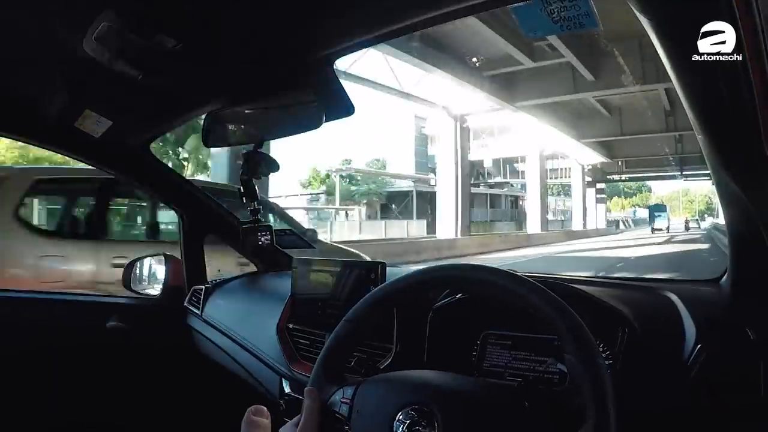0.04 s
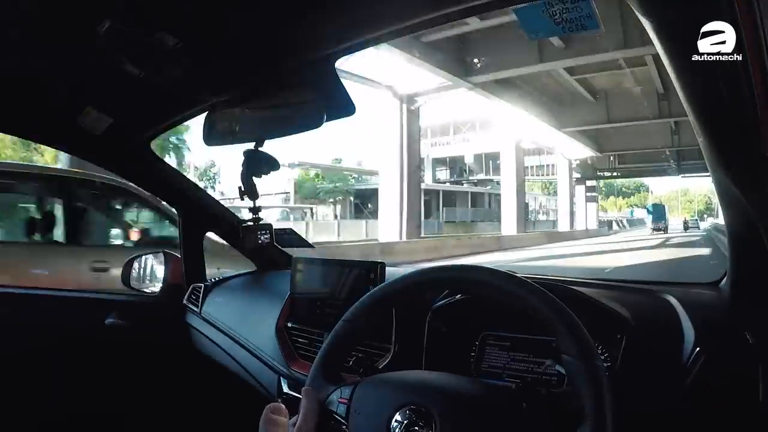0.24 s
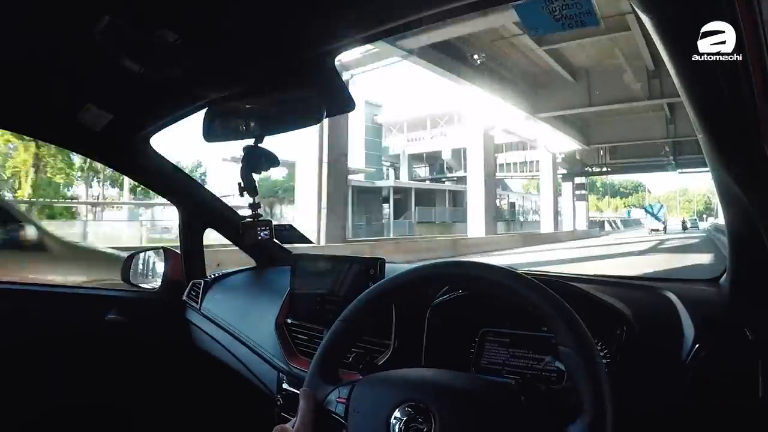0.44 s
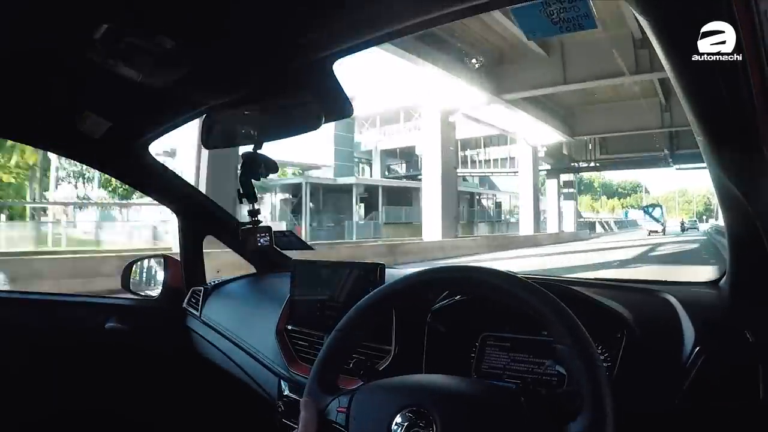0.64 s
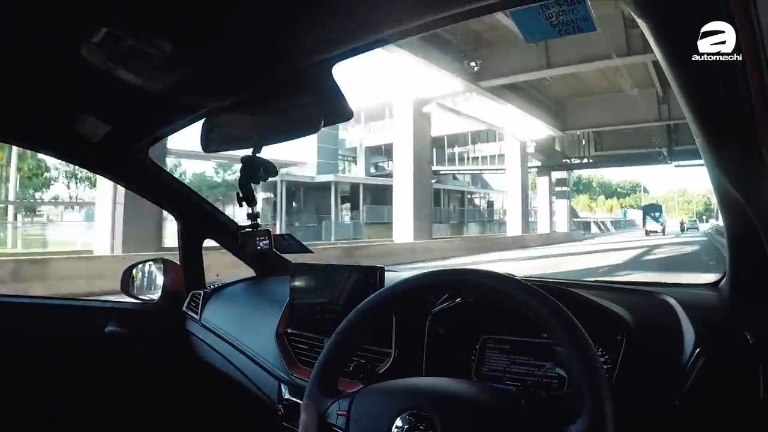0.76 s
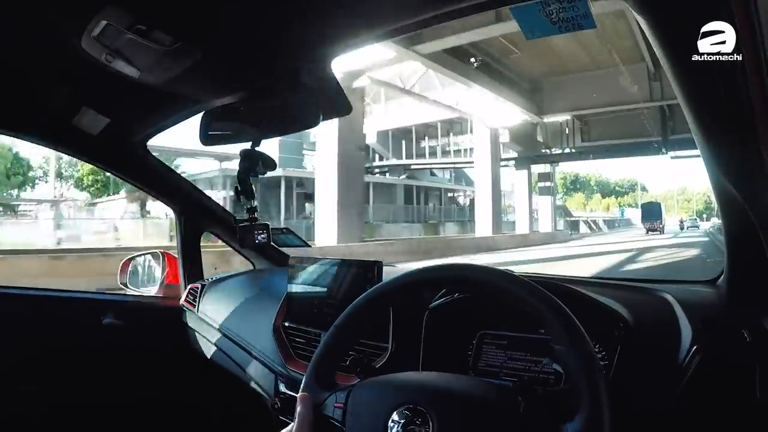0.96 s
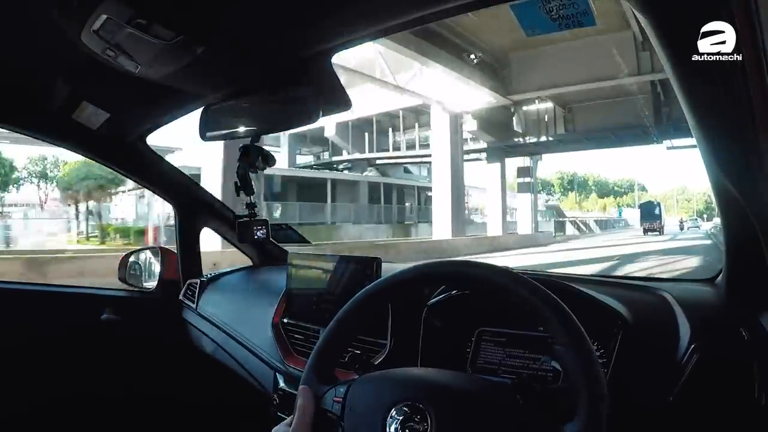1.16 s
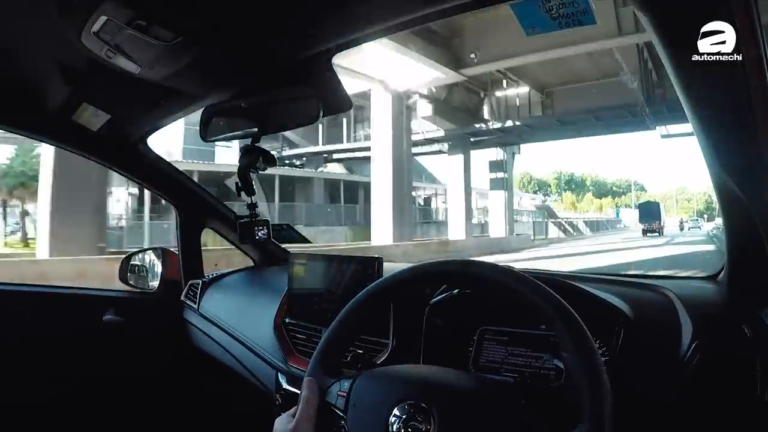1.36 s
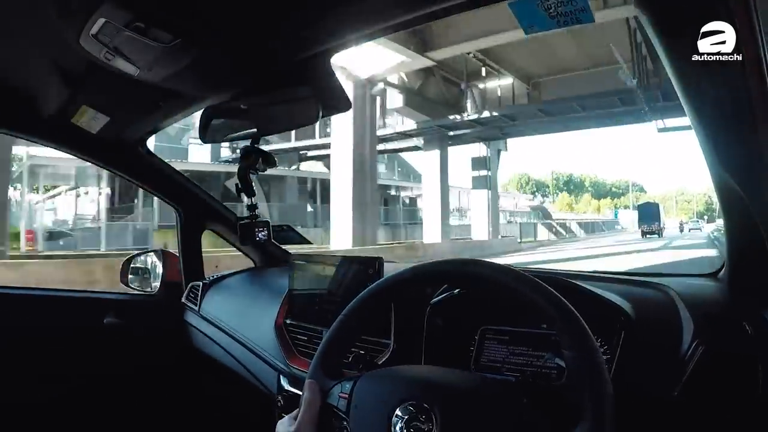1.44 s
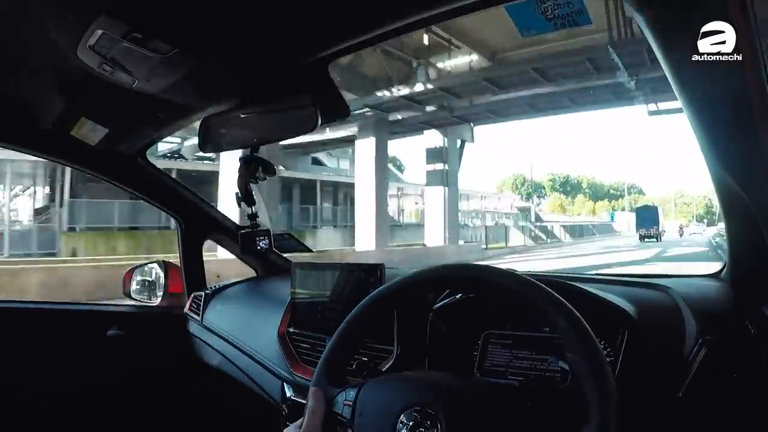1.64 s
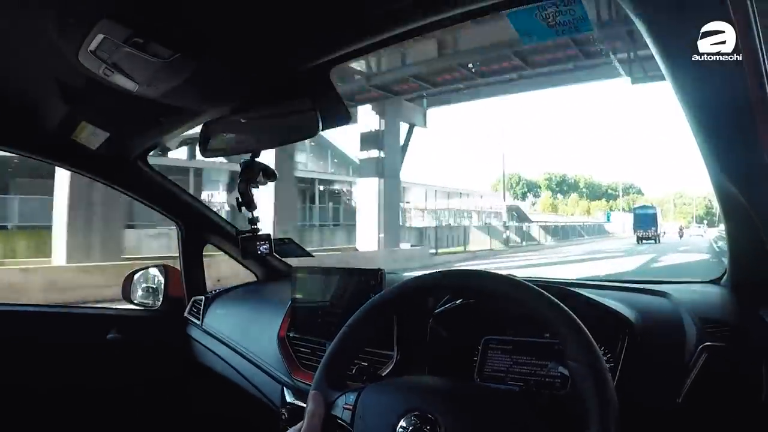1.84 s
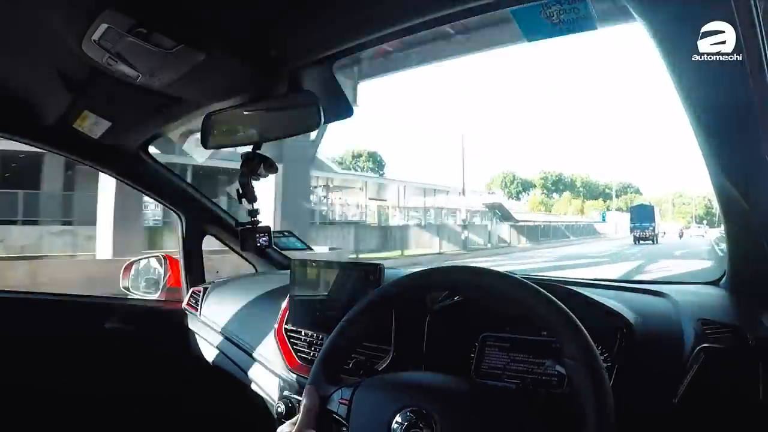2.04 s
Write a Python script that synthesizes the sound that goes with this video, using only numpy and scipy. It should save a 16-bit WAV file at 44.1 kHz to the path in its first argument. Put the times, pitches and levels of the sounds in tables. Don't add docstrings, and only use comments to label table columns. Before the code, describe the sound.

A four-cylinder car engine accelerates hard, heard by a microphone inside the closed cabin. From 0 seconds its low, boomy drone climbs through cabin resonances, rising more slowly after about 1.3. Tyres rumble underneath, with a soft thump near 0.3 and a stronger one near 1.35. Airy intake roar grows louder and brighter from about 1.1 until the cut at 2.1 seconds, over faint hiss.

```python
import sys
import numpy as np
from scipy import signal
from scipy.fft import rfft, irfft, next_fast_len
from scipy.io import wavfile
from scipy.ndimage import uniform_filter1d

SR = 44100
rng = np.random.default_rng(int(sys.argv[2]) if len(sys.argv) > 2 else 0)


def ratio_of_db(decibels):
    return 10 ** (np.asarray(decibels, float) / 20)


def unload_wav(signal):
    wavfile.write(
        sys.argv[1],
        SR,
        np.round(np.clip(np.atleast_2d(signal).T, -1, 1) * 32767).astype(np.int16),
    )


N = 92257


def evened(x):
    return x / np.sqrt(np.mean(x ** 2) + 1e-20)


def along(points):
    return np.interp(np.arange(N) / SR, *np.transpose(points))


def read(points, hz):
    f, value = np.transpose(points)
    return np.interp(np.log(hz + 1), np.log(f + 1), value)


def slow_chance(rate_hz):
    length = next_fast_len(N)
    spectrum = rfft(rng.standard_normal(length))
    smoothing = 1 + (np.fft.rfftfreq(length, 1 / SR) / rate_hz) ** 4
    return evened(irfft(spectrum / smoothing, length)[:N])


def patchy_noise(gain, patchy_db, size):
    frames = 4 * N // size + 12
    hz = np.fft.rfftfreq(size, 1 / SR)
    real, imaginary, patches = rng.standard_normal((frames, len(hz), 3)).T
    patches = uniform_filter1d(patches, size=10, axis=0)
    patches = evened(uniform_filter1d(patches, size=6, axis=1))
    spectra = (real + 1j * imaginary) * gain(hz)[:, None] * ratio_of_db(patchy_db * patches)
    sound = signal.istft(spectra, nperseg=size, noverlap=3 * size // 4)[1]
    return evened(sound[size:size + N])


# (t/s, firing rate f/Hz)
FIRING_RATE = [(0, 102.5), (.13, 109.4), (.4, 120.2), (.65, 134.8), (.91, 150.5), (1.04, 158.3),
               (1.17, 165.6), (1.3, 169.6), (1.43, 177.4), (1.56, 179.9), (1.69, 182), (1.82, 187),
               (2.09, 190.9)]


def firing_rate():
    return along(FIRING_RATE) * (1 + .0008 * slow_chance(rate_hz=3.3))


# (t/s, level/dB)
EFFORT = [
    (0, -5),
    (.3, -3.5),
    (.6, -3),
    (.85, -4),
    (1.1, -1),
    (1.4, 1),
    (1.7, 1),
    (2.09, 2),
]


def engine_effort():
    return along(EFFORT)


# (f/Hz, width/Hz, level/dB)
RESONANCES = [(228, 25, 5), (272, 18, 5), (310, 32, 9), (370, 25, 4), (468, 24, 6), (583, 18, 15),
              (685, 35, 6), (745, 35, 7), (890, 40, 5), (1110, 50, 7)]
# (f/Hz, width/Hz, depth 0-1)
DIPS = [(256, 10, .7), (293, 8, .5), (343, 14, .5), (418, 30, .6), (635, 30, .5)]


def cabin(hz):
    power = ratio_of_db(-5) ** 2
    for f, width, db in RESONANCES:
        power = power + ratio_of_db(db) ** 2 / (1 + (2 * (hz - f) / width) ** 2)
    gain = np.sqrt(power)
    for f, width, depth in DIPS:
        gain = gain * (1 - depth / (1 + (2 * (hz - f) / width) ** 2))
    return gain


# (f/Hz, level/dB)
BOOM = [(103, -26), (110, -23), (138, -24), (145, -35), (157, -45), (162, -30), (174, -25), (189, -18)]


def firing_tone(hz, turns):
    null_hz, null_width_hz, null_depth = 117.3, 3.5, .95
    null = 1 - null_depth / (1 + (2 * (hz - null_hz) / null_width_hz) ** 2)
    level_db = read(BOOM, hz) + 1.1 * slow_chance(rate_hz=11)
    return ratio_of_db(level_db) * null * np.sin(2 * np.pi * turns)


# (f/Hz, level/dB)
DRONE = [(206, -43), (220, -30), (236, -43), (257, -50), (268, -32), (285, -37), (318, -30), (340, -44)]


def second_order_drone(hz, turns):
    top_hz, top_width_hz, top_db = 368, 12, -36
    top = ratio_of_db(top_db) / (1 + (2 * (2 * hz - top_hz) / top_width_hz) ** 2)
    level = (ratio_of_db(read(DRONE, 2 * hz)) + top) * ratio_of_db(0.81 * slow_chance(rate_hz=30))
    return level * np.cos(4 * np.pi * turns + 1)


# (multiple of the firing rate, level/dB)
ORDERS = [(.5, -42), (.75, -46), (1.25, -39), (1.5, -46), (1.75, -41), (2.25, -47), (2.5, -44), (2.75, -50),
          (3, -49), (3.25, -50), (3.5, -50), (3.75, -55), (4, -52), (4.25, -57), (4.5, -55), (4.75, -54),
          (5, -54), (5.25, -56), (5.5, -59), (5.75, -60), (6, -55)]


def weak_orders(hz, turns, effort_db):
    orders = [*ORDERS]
    for multiple in np.arange(25, 49) / 4:
        orders.append((multiple, -61 - 2 * (multiple - 6) + 3 * rng.standard_normal()))
    waver_share, waver_hz = .2, 5
    out = np.zeros(N)
    for multiple, db in orders:
        waver = 1 + waver_share * (slow_chance(waver_hz) + 1j * slow_chance(waver_hz))
        tone = waver * np.exp(2j * np.pi * (multiple * turns + rng.random()))
        out += ratio_of_db(db + .5 * effort_db) * cabin(multiple * hz) * tone.real
    return out


def engine(hz, turns, effort_db):
    tones = firing_tone(hz, turns) + second_order_drone(hz, turns) + weak_orders(hz, turns, effort_db)
    return np.sqrt(2) * tones


# (f/Hz, level/dB per Hz)
ROAD = [(15, -10.5), (32, 0.5), (60, 3.5), (95, -1.5), (118, 8.5), (150, -4.5), (300, -11.5), (700, -23.5)]
# (t/s, length/s, level/dB)
BUMPS = [
    (.29, .07, 5),
    (1.08, .05, -1),
    (1.353, .1, 9.5),
    (1.65, .04, -2.5),
]


def road():
    t = np.arange(N) / SR
    bump_db = sum(db * np.exp(-((t - s) / length) ** 2) for s, length, db in BUMPS)

    def spectrum(f):
        return ratio_of_db(read(ROAD, f) - 9.65 * np.log2(1 + f / 900))

    rumble = patchy_noise(spectrum, patchy_db=-2.0, size=4096)
    thump_hz = 70
    deep = signal.sosfiltfilt(signal.butter(2, thump_hz, fs=SR, output="sos"), rumble)
    ring_hz, ring_s, ring_length_s, ring_db = 113.3, 1.11, 0.06, -29.5
    ring = ratio_of_db(ring_db) * np.exp(-((t - ring_s) / ring_length_s) ** 2) * np.sin(2 * np.pi * ring_hz * t)
    return ratio_of_db(-32) * (rumble + (ratio_of_db(bump_db) - 1) * deep) + np.sqrt(2) * ring


# (f/Hz, level/dB per Hz)
ROAR = [(150, -1.5), (350, -1), (700, -7.5), (1200, -13), (2500, -28.5), (4500, -38.5), (7500, -50.5),
        (15500, -59.5)]


def roar(turns, effort_db):
    def spectrum(f):
        return ratio_of_db(read(ROAR, f)) * cabin(f) ** 0.13 * f / (f + 120)

    body = patchy_noise(spectrum, patchy_db=-0.94, size=2048)
    bright_hz = 2510
    treble = signal.sosfiltfilt(signal.butter(1, bright_hz, "high", fs=SR, output="sos"), body)
    pulse = 1 + .2 * np.cos(2 * np.pi * turns)
    treble_gain = pulse * ratio_of_db(1.4 * effort_db)
    return ratio_of_db(-35.5 + 0.43 * effort_db) * (body + (treble_gain - 1) * treble)


def hiss():
    return ratio_of_db(-76) * rng.standard_normal(N)


def scene():
    hz, effort_db = firing_rate(), engine_effort()
    turns = np.cumsum(hz) / SR
    return (engine(hz, turns, effort_db) + road() + roar(turns, effort_db) + hiss())[None]


def roll_off(x):
    return signal.sosfilt(signal.butter(12, 15730, fs=SR, output="sos"), x)


def record(dry):
    return roll_off(dry)


dry = scene()
out = record(dry)
unload_wav(out)
```